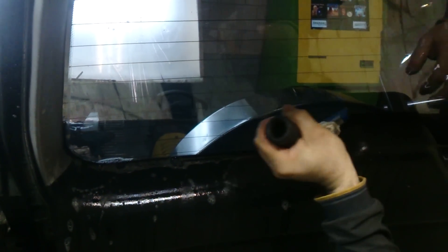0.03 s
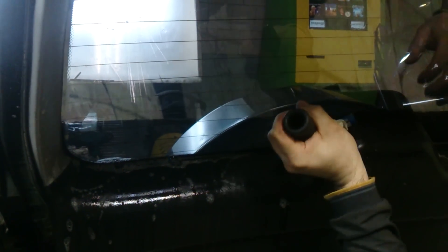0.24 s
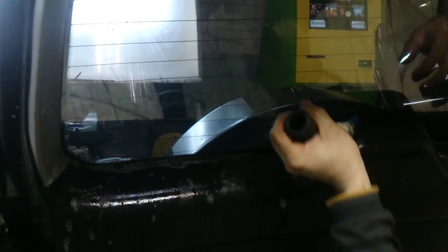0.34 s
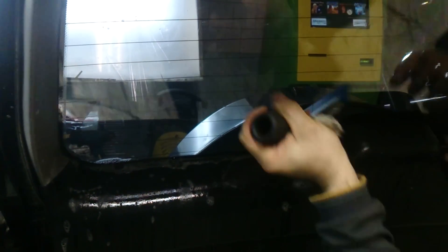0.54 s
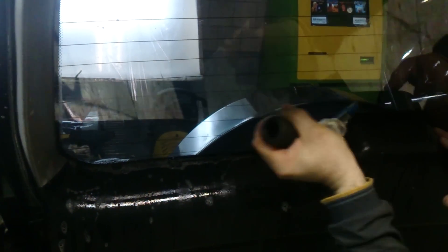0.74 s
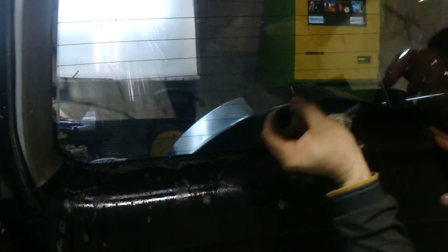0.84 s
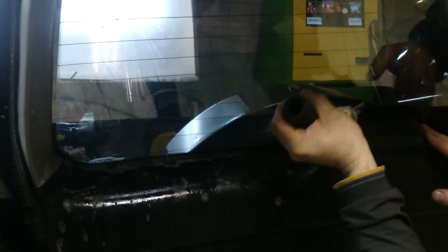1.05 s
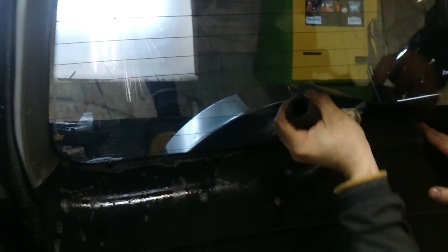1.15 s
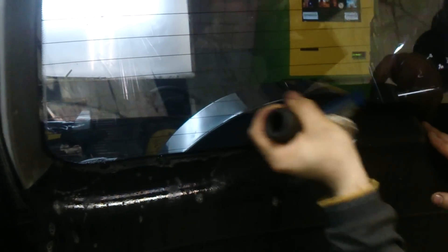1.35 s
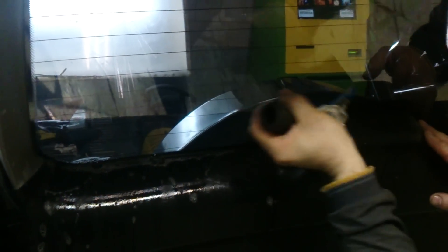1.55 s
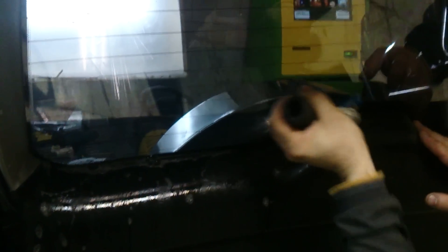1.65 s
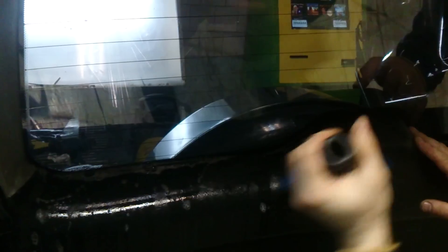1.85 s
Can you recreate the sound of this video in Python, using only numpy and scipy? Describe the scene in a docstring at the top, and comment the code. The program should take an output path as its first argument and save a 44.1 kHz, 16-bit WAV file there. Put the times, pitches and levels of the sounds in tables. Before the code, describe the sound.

Uneven dull knocks and short rubbing scrapes of a tool on a car's filmed rear glass

```python
"""Hand tool on window film

A tool is pushed over film on a car's rear window: its edge knocks the pane (decaying modes), judders
(near sine) and scrapes (dense catches); the film swishes and creaks (shaped noise).
A quiet workshop and the rumble of the car body lie behind; two unlike ports hear it all."""
import sys
import numpy as np
from scipy import signal
from scipy.fft import rfft, irfft
from scipy.io import wavfile
from scipy.ndimage import uniform_filter1d

SR = 44100
rng = np.random.default_rng(int(sys.argv[2]) if len(sys.argv) > 2 else 0)


def generate_wav(sig):
    """Save sig (samples, or channels by samples) to the path in sys.argv[1] as 16-bit PCM at SR."""
    pcm = np.round(np.clip(np.atleast_2d(sig).T, -1, 1) * 32767).astype(np.int16)
    wavfile.write(sys.argv[1], SR, pcm)


def gain_from_db(level_db):
    """Convert decibel levels to linear amplitude factors (20 dB per decade)."""
    decades = np.asarray(level_db, float) / 20
    return 10 ** decades


N = 83790
FREQ_HZ = np.fft.rfftfreq(N, 1 / SR) + 1e-3

# workshop air, spectrum [hz, density_db]
SHOP_COLOUR = [(12, 8), (20, -26), (148, -1), (424, -2.5), (897, 7.5), (1150, 0.5), (1480, -4), (3130, -8),
               (3490, -11), (6800, -36), (12200, -24), (15200, -32)]
# workshop width [hz, side_over_mid_ratio]
SHOP_WIDTH = [(25, .6), (200, .6), (1000, .9), (4000, 1)]
# rumble of the car body under the working arm [start_s, level_db]
RUMBLE_LEVEL = [(0, -68), (.3, -69.5), (.5, -69), (.7, -62.5), (.94, -66), (.97, -44), (1.0, -64),
                (1.3, -62), (1.45, -76.5), (1.6, -58), (1.68, -58), (1.85, -62.5)]
# swish of the film [start_s, level_db]
SWISH_LEVEL = [(0, -70.5), (.03, -74), (.08, -65), (.125, -62.5), (.21, -75), (.3, -86.5), (.45, -80.5),
               (.49, -74.5), (.53, -82.5), (.75, -77.5), (.95, -79.5), (1.05, -76), (1.12, -67), (1.2, -71),
               (1.29, -74), (1.34, -85), (1.45, -91.5), (1.7, -85.5), (1.8, -75.5), (1.86, -76)]
# swish spectrum [hz, density_db]
SWISH_SPECTRUM = [(1500, -9), (3000, -13), (5000, -9.5), (6800, -7.5), (7800, 1), (8800, -6.5),
                  (10000, -15.5), (13000, -18.5), (15300, -21)]
# creaks of the film [start_s, level_db before the swell, resonance_hz, length_s]
CREAKS = [(0.402, -61, 6460, 0.0061), (.404, -58.5, 3060, 0.01), (1.068, -70, 2900, 0.081),
          (1.085, -59.5, 2040, 0.032), (1.177, -68, 3600, 0.052), (1.629, -66.5, 2900, .02),
          (1.77, -71, 4930, 0.0076)]
# scraping edge [start_s, ringing_level_db, hiss_over_ringing_db, grind_over_ringing_db]
SCRAPE_LEVELS = [(0, -68.5, 4, 5), (.06, -75.5, -12, 4.5), (.33, -78, -12, 12), (.45, -66, -14, 8.5),
                 (.57, -70, -9.5, -2), (.8, -77.5, 6.5, 11.5), (.92, -72.5, 4, 10), (1.05, -85, 11, 23.5),
                 (1.085, -67, 6.5, 12.5), (1.12, -55.5, -11, -5), (1.14, -56.5, -6, -1),
                 (1.178, -67.5, 2, 7), (1.19, -53, -15, -14), (1.24, -54, -37, -6), (1.258, -59.5, -12, 3),
                 (1.3, -58.5, -9, -7), (1.33, -70.5, -6, -4), (1.4, -83.5, 1, -1), (1.52, -97, 11.5, 4),
                 (1.65, -73.5, 8, -24), (1.77, -74.5, 9, 2), (1.83, -58, -10, -2.5), (1.875, -69, 9.5, -10),
                 (1.9, -80, 10, -10)]
# dry hiss of the scrape, spectrum [hz, density_db]
SCRAPE_HISS = [(300, 7.5), (900, -6.5), (1400, 3), (2100, -8), (2700, -6.5), (3400, -11.5), (4500, -20.5),
               (7000, -24), (15000, -48)]
# juddering edge, one list a stroke [start_s, slip_rate_hz, level_db]
JUDDER_STROKES = [
    [(0.376, 240.9, -70), (0.396, 239, -32.5), (0.416, 256.6, -36), (0.42, 250, -67), (0.442, 226, -34.5),
     (0.454, 216, -86), (0.46, 227, -81), (0.475, 232, -64)],
    [(1.065, 220.5, -65.5), (1.103, 213, -39), (1.117, 248, -44), (1.123, 238, -51), (1.131, 201, -31),
     (1.139, 197.7, -33.5), (1.195, 236, -54)],
]
# upper modes of pane and tool [mode_hz, level_db, t60_s]
PANE_MODES = [(353.5, -1, 0.042), (462.7, -4, 0.048), (651.4, 3, 0.027), (829, 3, 0.029),
              (865, -7.5, 0.074), (984, 2.5, 0.027), (1171, 1.5, 0.019), (1372, -0.5, 0.018),
              (1509, -8, 0.026), (1674, -9, 0.033), (2100, -8, 0.044), (2460, -8.5, 0.027),
              (2900, -7.5, .015), (3320, -6, .015)]
# knocks [start_s, thud_peak_db, thud_hz, thud_t60_s, upper_modes_over_thud_db]
KNOCK_EVENTS = [(.004, -51.5, 138.5, 0.15, -24), (.087, -58, 123, 0.21, -36),
                (.2445, -36.5, 180, 0.072, -7), (.269, -46, 256, 0.14, -4), (.31, -53.5, 251, 0.063, -6),
                (.3985, -36.5, 248.4, 0.18, 7.5), (.4045, -43, 260, 0.0066, 10.5),
                (.4115, -30, 181.6, 0.18, -5.5), (.485, -48, 233.4, 0.24, -20),
                (.521, -54.5, 211, 0.13, -4), (.610, -47.5, 148, 0.14, -3),
                (.6535, -32.5, 153.6, 0.082, -1.5), (.69, -43, 138, 0.055, -30),
                (.815, -44.5, 148, 0.12, -8.5), (.908, -55, 308, 0.036, -11), (.99, -49.5, 280, 0.033, -36),
                (1.152, -64, 200, 0.019, 12), (1.204, -38, 169, 0.099, 2), (1.271, -50, 298, 0.033, 9),
                (1.527, -53.5, 150, 0.14, -5), (1.575, -44.5, 166, 0.16, -2), (1.630, -37.5, 160, 0.08, -8),
                (1.637, -43.5, 155, 0.045, -9), (1.664, -45.5, 131, 0.058, -11),
                (1.7715, -49, 335, 0.05, 13)]
# bumps nearer the left port [start_s, thud_peak_db, thud_hz, thud_t60_s, upper_modes_over_thud_db]
BUMP_EVENTS = [(.9605, -34, 178.5, 0.038, -19.5), (1.596, -45, 147, 0.035, -5),
               (1.693, -45.5, 188, 0.039, -27), (1.728, -52, 135, 0.016, -19)]
# level between the ports [hz, left_minus_right_db]
PORT_BALANCE = [(60, -5), (400, -6), (700, 1), (1000, -3), (1500, -13), (2500, -18), (4500, -24),
                (9000, -26), (13000, -12)]
# phase between the ports [hz, left_lead_rad]
PORT_LEAD = [(100, 0.28), (860, 0.81), (1640, -4), (2840, -11)]
# each port's own hiss, spectrum [hz, density_db]
PORT_HISS = [(1000, -13.5), (4000, -1), (9000, -8.5), (13000, -8), (15500, -8)]

SEAT_RISE_S = 0.0006  # the ring builds while the edge seats
RING_SAMPLES = 12000


def unit(x):
    """Scale to rms 1."""
    return x / np.sqrt(np.mean(x ** 2))


def over_hz(table):
    """Read a (hz, value) table at every frequency, on a log axis."""
    hz, value = np.array(table, float).T
    return np.interp(np.log(FREQ_HZ), np.log(hz + 1), value)


def over_time(table, column=1):
    """Read a column of a (start_s, ..) table at every sample."""
    rows = np.array(table, float)
    return np.interp(np.arange(N) / SR, rows[:, 0], rows[:, column])


def noise(colour):
    """Gaussian noise of rms 1 with a (hz, density_db) spectrum."""
    return unit(irfft(rfft(rng.standard_normal(N)) * gain_from_db(over_hz(colour)), N))


def flicker(rate_hz):
    """Random levels, one each 1 / rate_hz, smoothed into slopes."""
    hold = int(SR / rate_hz)
    steps = np.repeat(rng.standard_normal(N // hold + 1), hold)
    return 1.32 * uniform_filter1d(uniform_filter1d(steps, hold), hold)[:N]


def ring(modes):
    """Impulse response of (hz, level_db, t60_s) modes, all set off together."""
    t = np.arange(RING_SAMPLES) / SR
    return sum(gain_from_db(db) * np.sin(2 * np.pi * hz * t) * np.exp(-np.log(1000) * t / t60_s)
               for hz, db, t60_s in modes)


def seating():
    """Gradual onset of a ring while the edge seats."""
    return np.tanh(np.arange(RING_SAMPLES) / SR / SEAT_RISE_S)


def push(x, contact_s):
    """Soften by a contact of this length; peak 1."""
    y = np.convolve(x, np.hanning(int(contact_s * SR) + 3))[:len(x)]
    return y / np.abs(y).max()


def shop():
    """Workshop air: stereo noise, slightly wavering, wider towards the treble."""
    level_db, waver_db = -77, 1.4
    mid = noise(SHOP_COLOUR)
    side = irfft(rfft(noise(SHOP_COLOUR)) * over_hz(SHOP_WIDTH), N)
    return gain_from_db(level_db + waver_db * flicker(12.7)) * np.array([mid + side, mid - side])


def rumble():
    """Car body shaking under the arm: low stereo noise that falls away above 74 Hz."""
    side_db, waver_db = -3.5, 2.5
    colour = [(15, -6), (30, -4), (74, -2), (130, -25), (1000, -90)]
    mid, side = noise(colour), gain_from_db(side_db) * noise(colour)
    return gain_from_db(over_time(RUMBLE_LEVEL) + waver_db * flicker(4)) * np.array([mid + side, mid - side])


def swish():
    """Film sliding under the edge: smooth bright hiss."""
    flicker_db = 1.5
    return gain_from_db(over_time(SWISH_LEVEL) + flicker_db * flicker(30.7)) * noise(SWISH_SPECTRUM)


def creaks():
    """Film creaking: short swells of grit, each through one resonance."""
    q = 4.5
    out = np.zeros(N)
    for start_s, level_db, hz, length_s in CREAKS:
        i, length = int(start_s * SR), int(length_s * SR)
        a, b = rng.standard_normal((2, 4000))
        grit = a * np.abs(b)
        band = signal.lfilter(*signal.iirpeak(hz, q, fs=SR), grit)[-length:]
        swell = np.sin(np.pi * np.arange(length) / length)
        out[i:i + length] += gain_from_db(level_db) * unit(band) * swell
    return out


def scrape():
    """Edge scraping: dense uneven catches ring pane and thud modes, over a dry hiss."""
    catches_per_s, scatter_db, hiss_flicker_db = 2200, 2.2, 2.5
    catches = (rng.random(N) < catches_per_s / SR) * rng.standard_normal(N)
    catches = catches * gain_from_db(scatter_db * rng.exponential(size=N))
    # each catch seats like a small tap
    ringing = unit(signal.fftconvolve(catches, seating() * ring(PANE_MODES))[:N])
    thud_modes = [(150, -2.0, 0.28), (279.0, 5.7, 0.046)]  # hz, level_db, t60_s
    grind = unit(signal.fftconvolve(catches, ring(thud_modes))[:N])
    hiss = noise(SCRAPE_HISS) * gain_from_db(hiss_flicker_db * flicker(42.25))
    hiss = hiss * gain_from_db(over_time(SCRAPE_LEVELS, column=2))
    grind = grind * gain_from_db(over_time(SCRAPE_LEVELS, column=3))
    return gain_from_db(over_time(SCRAPE_LEVELS)) * (ringing + grind + hiss)


def judder():
    """Edge sticking and slipping in step with the flexing pane: a near sine."""
    roughness = 0.01  # relative rate wander
    out, t = np.zeros(N), np.arange(N) / SR
    for stroke in JUDDER_STROKES:
        rate_hz = over_time(stroke) * (1 + roughness * flicker(68.9))
        wave = np.sqrt(2) * np.sin(2 * np.pi * np.cumsum(rate_hz) / SR)
        inside = 1. * (t > stroke[0][0]) * (t < stroke[-1][0])
        out += uniform_filter1d(inside, 300) * gain_from_db(over_time(stroke, column=2)) * wave
    return out


def thud(hz, t60_s):
    """Low pane mode and its overtone, softened by contact; a small pane radiates little bass."""
    overtone_ratio, overtone_db, small_pane_hz, contact_s = 1.668, -5, 124.5, 0.0015
    low = ring([(hz, 0, t60_s), (hz * overtone_ratio, overtone_db, t60_s / 2)])
    low = signal.lfilter(*signal.butter(3, small_pane_hz, "high", fs=SR), low)
    return push(low, contact_s)


def tap(peak_db):
    """Upper modes, scattered anew each time; a harder tap has a shorter contact."""
    contact_s, at_db, contact_law = .0004, -35, .4  # contact_s holds for a tap at at_db
    pitch_scatter, scatter_db = 0.029, 2.7
    chance = rng.standard_normal((len(PANE_MODES), 2))
    modes = [(hz * (1 + pitch_scatter * a), db + scatter_db * b, t60_s)
             for (hz, db, t60_s), (a, b) in zip(PANE_MODES, chance)]
    return push(seating() * ring(modes), contact_s / gain_from_db(peak_db - at_db) ** contact_law)


def tail():
    """Short dull answer of the cabin: decaying band-limited noise."""
    level_db, rise_s, t60_s, band_hz = -19, .008, 0.27, [250, 1030]
    t = np.arange(RING_SAMPLES) / SR
    hiss = rng.standard_normal(RING_SAMPLES)
    dull = unit(signal.lfilter(*signal.butter(2, band_hz, "band", fs=SR), hiss))
    return dull * gain_from_db(level_db - 60 * t / t60_s) * np.tanh(t / rise_s)


def knocks(events):
    """Edge knocking the pane: a soft thud, then a tap with the cabin's tail."""
    tap_lag = int(0.00029 * SR)  # samples after the thud
    out = np.zeros(N + 13000)
    for start_s, peak_db, hz, t60_s, upper_db in events:
        upper = np.pad(tap(peak_db + upper_db) + tail(), (tap_lag, 0))[:RING_SAMPLES]
        i = int(start_s * SR)
        out[i:i + RING_SAMPLES] += gain_from_db(peak_db) * (thud(hz, t60_s) + gain_from_db(upper_db) * upper)
    return out[:N]


def ports(pane):
    """Two unlike ports: the left is duller, leads in the bass and lags higher up."""
    ratio = gain_from_db(over_hz(PORT_BALANCE))
    right = 2 / (1 + ratio)  # the two gains average 1
    left = right * ratio * np.exp(1j * over_hz(PORT_LEAD))
    return irfft(rfft(pane, axis=1) * np.array([left, right]), N, axis=1)


def scene():
    """Pane sounds through the two ports, over workshop and rumble."""
    bump_left_minus_right_db = 16
    bumps = knocks(BUMP_EVENTS) * gain_from_db(bump_left_minus_right_db * np.array([[.5], [-.5]]))
    pane = swish() + creaks() + scrape() + judder() + knocks(KNOCK_EVENTS) + bumps
    return shop() + rumble() + ports(pane)


def low_pass(x):
    """Removes everything above the highest recorded frequency."""
    return signal.sosfilt(signal.butter(12, 15370, fs=SR, output="sos"), x)


def record(dry):
    """Each port adds its own faint hiss."""
    hiss_db = -82
    hiss = gain_from_db(hiss_db) * np.array([noise(PORT_HISS), noise(PORT_HISS)])
    return low_pass(dry + hiss)


dry = scene()
out = record(dry)
generate_wav(out)
```